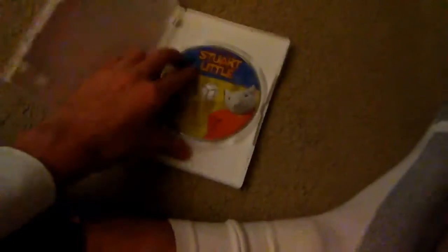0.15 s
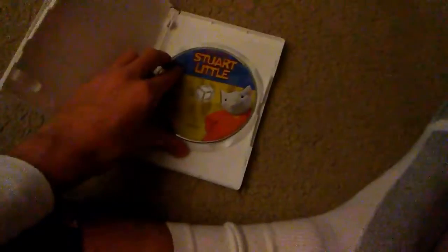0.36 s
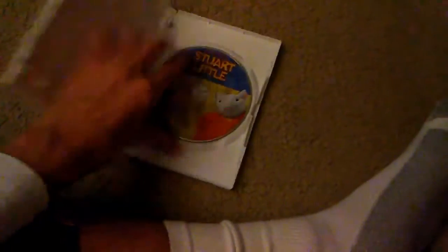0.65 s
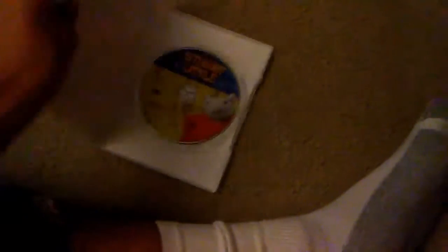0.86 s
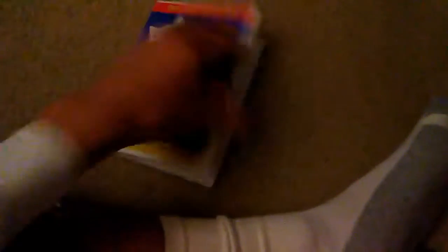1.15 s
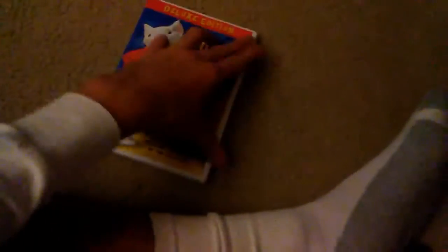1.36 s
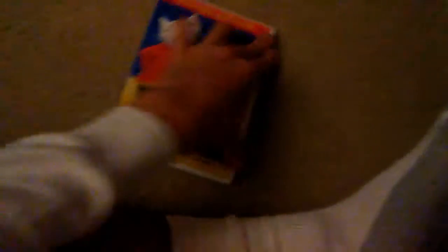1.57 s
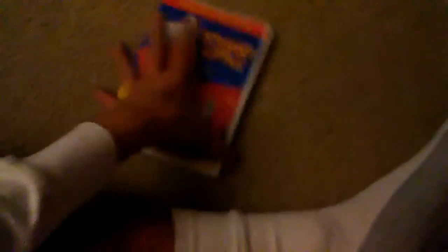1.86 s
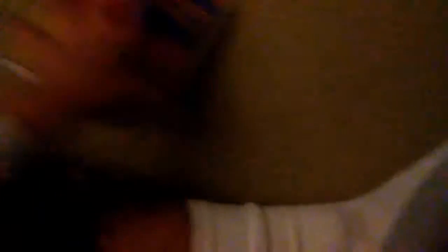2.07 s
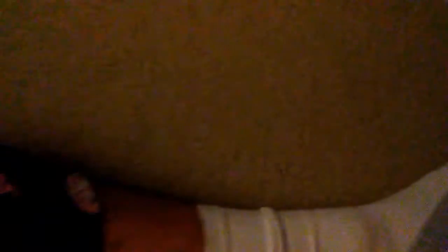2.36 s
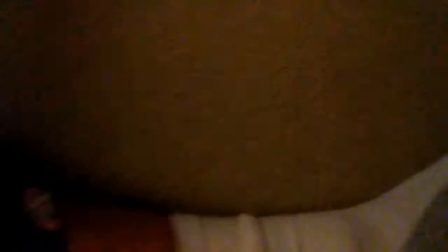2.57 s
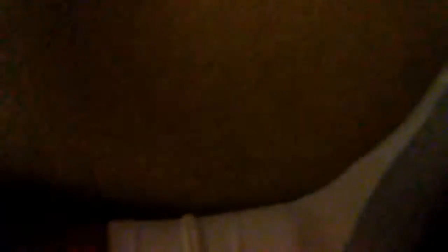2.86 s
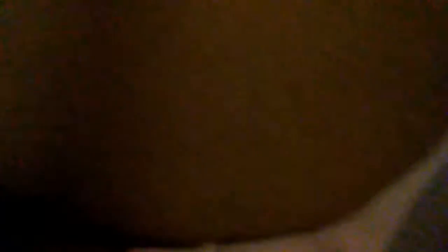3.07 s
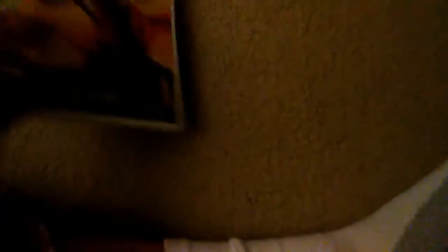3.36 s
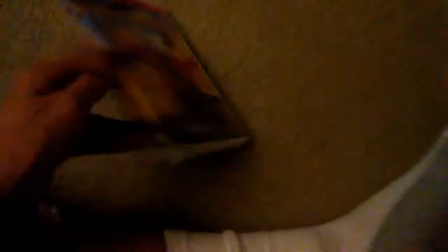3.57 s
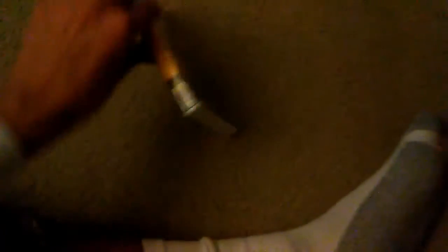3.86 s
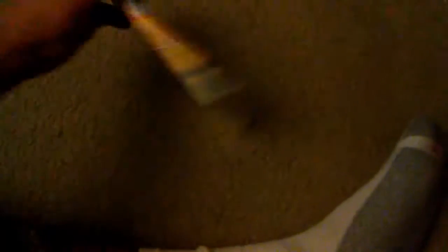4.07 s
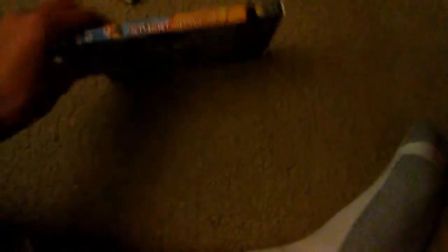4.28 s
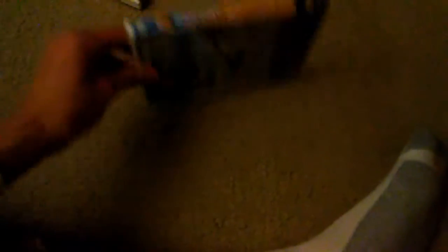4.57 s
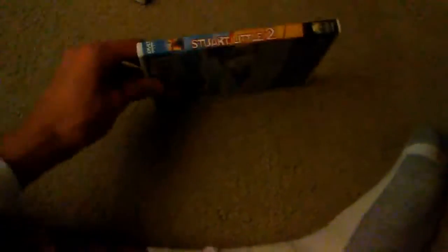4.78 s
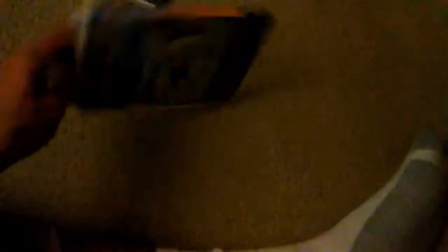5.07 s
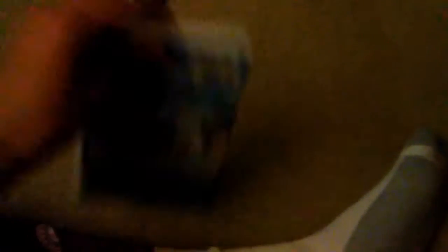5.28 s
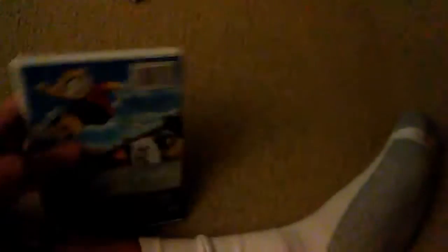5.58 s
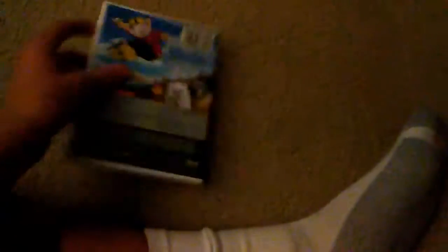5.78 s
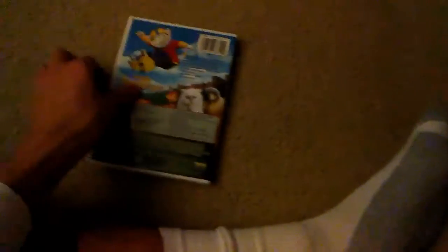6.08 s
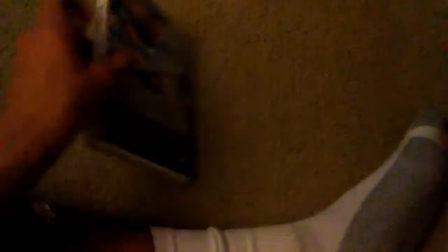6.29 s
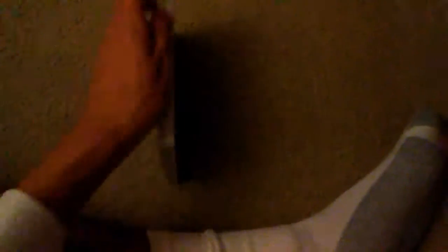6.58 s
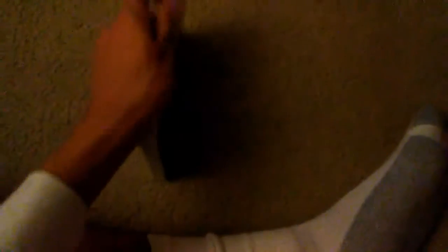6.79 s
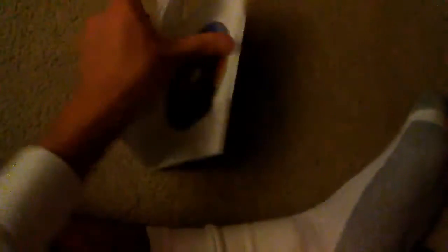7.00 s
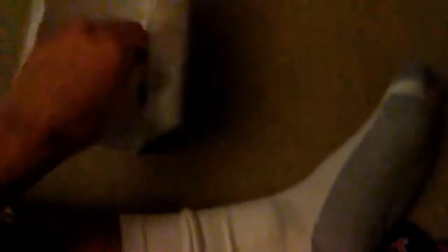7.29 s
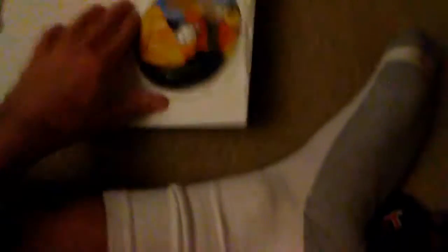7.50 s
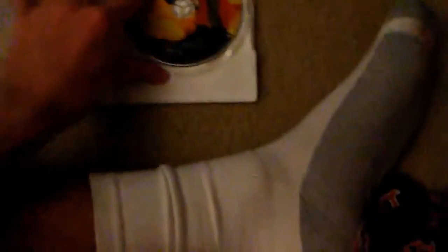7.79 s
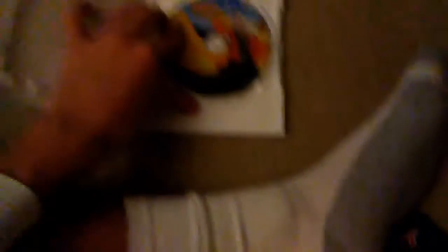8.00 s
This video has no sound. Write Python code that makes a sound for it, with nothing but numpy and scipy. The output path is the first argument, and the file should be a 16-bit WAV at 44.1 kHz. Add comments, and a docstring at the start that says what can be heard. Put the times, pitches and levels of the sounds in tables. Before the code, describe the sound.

Sharp plastic clicks and rattling clacks come from disc cases being shut, dropped and opened on a carpeted floor near the microphone. The loudest snaps fall in the first half, followed by a quieter spell of small grip creaks and sleeve rustle. The clatter then returns twice and ends in a few soft taps. Muffled bumps accompany the handling, with a short room echo and low steady hiss.

```python
"""A hand shuts, drops, turns and opens thin plastic disc cases on a carpet, near a small camera.
Over steady hiss, rumble and a thin whine, dull bumps shake the floor and skin and sleeve rub.
Snaps and knocks, each a rattle of contacts ringing the shell, echo in a furnished room, loudest at
1.7, 2.5 and 3.1 s. From 3.8 to 4.8 s the closed case creaks as gripping fingers stick and slip.
Clatter returns near 6 and 7 s, then thins to light taps. The camera rounds the loudest peaks."""
import sys
import numpy as np
from scipy import signal
from scipy.fft import rfft, irfft
from scipy.io import wavfile
from scipy.ndimage import uniform_filter1d

SR = 44100
rng = np.random.default_rng(int(sys.argv[2]) if len(sys.argv) > 2 else 0)


def output_pcm(signal):
    """Save a mono or channel-first signal as 16-bit PCM at the path in sys.argv[1].

    Samples are clipped to [-1, 1] before scaling.
    """
    pcm = np.clip(np.atleast_2d(signal).T, -1, 1) * 32767
    wavfile.write(sys.argv[1], SR, np.round(pcm).astype(np.int16))


N = 358533


def undb(db):
    return 10 ** (np.asarray(db) / 20)


def unit_rms(x):
    return x / np.sqrt(np.mean(x ** 2, axis=-1, keepdims=True))


def on_log_hz(hz, table):
    table_hz, values = np.transpose(table)
    return np.interp(np.log(hz + 1), np.log(table_hz), values)


def ring(x, modes, gains=None):
    """Rows of x through parallel resonances; default gains alternate in sign."""
    mode_hz, width_hz, db = np.transpose(modes)[:, :, None]
    ratio = (np.fft.rfftfreq(x.shape[-1], 1 / SR) + 1e-9) / mode_hz
    responses = undb(db) / (1 + 1j * mode_hz / width_hz * (ratio - 1 / ratio))
    if gains is None:
        gains = (-1.) ** np.arange(len(modes))
    return irfft(rfft(x) * (gains @ responses), x.shape[-1])


def wander(rate_hz):
    """Random steps, smoothed twice; spread near 1."""
    hold = int(SR / rate_hz)
    steps = np.repeat(rng.standard_normal(N // hold + 1), hold)
    return 1.6 * uniform_filter1d(uniform_filter1d(steps, hold), hold)[:N]


def place(start_s, rows):
    """Sums rows into one track at their start times."""
    track = np.zeros(N + rows.shape[1])
    first = (np.clip(start_s, 0, None) * SR).astype(int)
    np.add.at(track, first + np.arange(rows.shape[1]), rows)
    return track[:N]


# Noise spectrum: freq_hz, relative_density_db
HISS_SPECTRUM = [(26, -33), (45, 1.5), (166, -1.5), (251, -8.5), (338, -15.5), (1340, -18.5), (2240, -19),
                 (3850, -19), (8040, -22), (12200, -22.5), (13100, -13.5), (16000, -30.5)]


def camera_noise(hiss_db=-69, whine_db=-71.5, whine_hz=13500):
    """Hiss and rumble, plus an electronic whine of wavering level."""
    shape = undb(on_log_hz(np.fft.rfftfreq(N, 1 / SR), HISS_SPECTRUM))
    hiss = unit_rms(irfft(rfft(rng.standard_normal(N)) * shape, N))
    whine = np.sqrt(2) * np.sin(2 * np.pi * whine_hz * np.arange(N) / SR) * undb(1.5 * wander(6))
    return undb(hiss_db) * hiss + undb(whine_db) * whine


# Floor modes: freq_hz, width_hz, gain_db
FLOOR_MODES = [(58, 27, 2), (108, 160, 2.5)]
# Soft pushes: start_s, level_db, length_ms
BUMPS = [(0, -35.5, 20), (0.1, -40, 29), (0.99, -57.5, 59), (1.648, -52, 97), (1.98, -71, 130),
         (2.811, -60, 38), (2.899, -41.5, 76), (3.117, -39.5, 51), (3.431, -53.5, 71), (4.118, -58.5, 47),
         (4.741, -57.5, 66), (5.952, -45, 29), (6.041, -40.5, 30), (7.04, -43, 61), (7.258, -46, 147),
         (7.41, -45.5, 45)]


def bumps(size=16384):
    """Dull pushes shake the floor under the carpet."""
    start_s, level_db, length_ms = np.transpose(BUMPS)[:, :, None]
    t_ms = np.arange(size) / SR * 1000
    push = rng.standard_normal((len(BUMPS), size)) * np.sin(np.pi * np.clip(t_ms / length_ms, 0, 1))
    shake = unit_rms(ring(ring(push, FLOOR_MODES), FLOOR_MODES))
    return place(start_s, undb(level_db) * np.sqrt(length_ms / t_ms[-1]) * shake)


# Friction peaks, mid (grit) and high (sheen): freq_hz, width_hz, gain_db
GRIT_PEAKS = [(4270, 440, 1.5), (5840, 900, -2.5), (6770, 270, -6), (3700, 450, -6)]
SHEEN_PEAKS = [(11200, 2500, -2.5), (12200, 1300, 2.5), (15000, 7500, -6.5)]
# Case wall and catch modes, rubbed or knocked: freq_hz, width_hz, gain_db
SHELL_MODES = [(730, 54, -3), (941.7, 99, 2), (1160, 240, 0), (1458, 210, 1), (1652, 210, 0),
               (1960, 160, 0), (2180, 170, -1.5), (2525, 130, 3.5), (2723, 290, -1.5), (3110, 210, -3.5)]
# Skin and cloth strokes: centre_s, length_ms, grit_db, dryness_db
STROKES = [(0.008, 31, -31, -13.5), (0.054, 20, -34, 0.5), (0.139, 163, -45, -3.5), (0.3, 62, -64.5, 9),
           (0.428, 57, -74.5, 4), (0.77, 44, -65.5, 6.5), (0.868, 32, -47.5, 4.5), (1.9, 230, -69, -3),
           (2.04, 113, -73, 4.5), (2.982, 72, -54.5, -2.5), (3.126, 42, -52.5, -6.5), (3.6, 148, -66, -2),
           (3.77, 78, -65, -1.5), (3.88, 79, -61.5, -1.5), (4.17, 131, -67, 6.5), (4.4, 160, -69.5, 5),
           (5.07, 141, -55, 2.5), (5.62, 190, -59, 4.5), (5.863, 110, -61, -2.5), (6.599, 120, -63.5, 1.5),
           (6.78, 150, -67, 6), (6.941, 126, -64, 3.5), (7.23, 310, -55, 2), (7.397, 195, -44.5, -4.5),
           (7.51, 164, -57.5, 8), (7.57, 33, -44.5, 1.5), (7.68, 60, -65, 4), (8.07, 42, -73.5, -6)]


def rubbing(slips_per_s=120, slip_db=20, step=64):
    """Stick-slip grit swells and fades; drier strokes have more sheen and less shell."""
    centre_s, length_ms, grit_db, dryness_db = np.transpose(STROKES)[:, :, None]
    t = np.arange(N // step + 1) * step / SR
    swell = 1 / (1 + ((t - centre_s) / (length_ms / 2000)) ** 2) ** 1.4
    slips = undb(slip_db) * rng.standard_normal(N) * (rng.random(N) < slips_per_s / SR)
    rub = 0
    for modes, level_db, slip_share in ((GRIT_PEAKS, grit_db, .25),
                                        (SHEEN_PEAKS, grit_db - 2.5 + dryness_db, .3),
                                        (SHELL_MODES, grit_db - 6 - .64 * dryness_db, 1)):
        grit = rng.standard_normal(N) * undb(.57 * rng.exponential(size=N) + 2.5 * wander(40))
        envelope = np.sqrt(np.sum((undb(level_db) * swell) ** 2, axis=0))
        rub += np.repeat(envelope, step)[:N] * unit_rms(ring(grit + slip_share * slips, modes))
    return rub


# Modes of flexing lids, rims and ribs, contact spot: freq_hz, width_hz, gain_db
LID_MODES = [(154, 12, -0.5), (232, 55, -4), (326, 100, -0.5), (464, 49, -0.5), (610, 10, -14)]
EDGE_MODES = [(3640, 390, -5), (4710, 536, 0), (5720, 766, 1), (5790, 600, -0.5), (6408, 350, -9.5)]
CRACK_MODES = [(8340, 690, -10), (10300, 300, 1), (11840, 1000, 3.5), (15100, 1400, -6.5)]
# Snaps and knocks: start_s, shell_db, pitch_hz, thud_re_shell_db, edge_re_shell_db, rattle_ms
KNOCKS = [(0.0229, -17.5, 2480, -8.5, -7, 4.54), (0.0393, -18.5, 2200, -22.5, -8.5, 6.3),
          (0.09, -27.5, 2300, -39, -6, 5.9), (0.0992, -21, 2410, -19, -10, 2.7),
          (0.106, -33, 1070, 1.5, -5, 5.5), (0.121, -22, 2560, -35, -13, 4.2),
          (0.1664, -24, 2510, -17.5, -4, 3.76), (0.2434, -33, 2370, -18, -10.5, 5.4),
          (0.2661, -40.5, 2560, -30.5, -6, 3.8), (0.333, -55, 2020, -23, -14, 2.8),
          (0.842, -46, 2490, -30, -4, 3.76), (0.8492, -37, 2480, -34.5, 2, 4.6),
          (0.86, -46.5, 1500, -30, 6.5, 7), (0.9444, -54, 1340, -3, 1.5, 4.4),
          (1.0093, -47, 2330, -1, -11.5, 7.5), (1.1672, -49.5, 1420, -36, -16, 0.46),
          (1.3785, -29, 1307, -8, -19, 1.37), (1.3948, -44, 2550, -8.5, -2, 3.5),
          (1.5574, -46.5, 2500, -18, -15, 2.95), (1.631, -49, 2560, -0.5, -7, 8.3),
          (1.651, -8.5, 2084, -17, -5, 1.5), (1.6774, -11.5, 2130, -22, -3.5, 1.29),
          (1.6913, -19.5, 1160, -12, -3.5, 9.3), (2.27, -55.5, 1027, -11.5, -12.5, 3.3),
          (2.2812, -41, 1085, -15.5, -16.5, 3), (2.316, -58, 1243, -21, -11.5, 2.8),
          (2.4439, -10, 2740, -15, -8, 0.74), (2.4656, -7.5, 738, -1, -7.5, 1.78),
          (2.8168, -62, 730, 6, -16, 1.0), (2.8975, -34.5, 747, -10.5, -4, 7.1),
          (2.9109, -34, 3200, -3.5, -9, 8.3), (2.9264, -30.5, 2380, -6, 1, 3.4),
          (2.9382, -31, 2646, -9.5, -0.5, 6.2), (3.0241, -53.5, 2630, -4, 2, 7.8),
          (3.1392, -11, 2020, -8.5, -4.5, 0.44), (3.259, -52, 1380, -12, -22, 32),
          (3.42, -42.5, 1996, -13.5, -4.5, 7.1), (3.4324, -31.5, 3070, -13.5, -6, 1.7),
          (3.452, -33, 2850, -14, -4.5, 6.7), (3.544, -49.5, 2904, -9, -1.5, 4.7),
          (3.7309, -45.5, 2634, -12, 0, 2.93), (5.459, -62.5, 2400, -19.5, -7, 12),
          (5.5186, -47.5, 933, -21.5, -3.5, 4.4), (5.545, -54, 940, -27, -9, 14),
          (5.5712, -41, 2390, -36, -14, 1.53), (5.587, -39.5, 2220, -35, -5.5, 2.3),
          (5.61, -54, 2380, -28, -12, 16), (5.75, -58.5, 1656, -19.5, -10.5, 9),
          (5.94, -41, 1960, -15.5, -7.5, 3), (5.9464, -25, 1290, -7, -14, 4.3),
          (5.9562, -18.5, 2560, -2, 0, 4.07), (5.9804, -21.5, 1320, -12.5, -18, 4.1),
          (6.037, -30.5, 1820, -22, -14, 3.7), (6.058, -22, 1013, -7, -2.5, 3.3),
          (6.0687, -18, 2560, -11, -7.5, 5.36), (6.085, -32, 2990, -7, 0.5, 3),
          (6.0999, -42, 2500, -6.5, 3.5, 2.3), (6.351, -42, 2346, -11.5, -23, 1.7),
          (6.3637, -55, 1698, -12.5, -6, 4.9), (6.3856, -55, 1000, -14, -4, 3.5),
          (6.5228, -54, 1500, -12.5, 6, 1.33), (6.545, -48.5, 3330, -15, 1, 6.5),
          (6.896, -57, 3220, -26, 3, 8.3), (7.0112, -46.5, 2560, -25, -6, 1.9),
          (7.0324, -32.5, 2580, -14, -14, 2.3), (7.0421, -12, 2030, -11, -4, 3.5),
          (7.0605, -15, 2646, -30, -2, 5.84), (7.085, -17, 1960, -28, -3.5, 6.9),
          (7.1705, -28, 1960, -22, -5, 4.2), (7.185, -41.5, 1960, -26, 3, 2.5),
          (7.241, -44, 943, -18, -12, 9), (7.263, -31, 940, -18, -13, 4.6),
          (7.2885, -33.5, 2560, -39, -5.5, 9.7), (7.3391, -16, 2310, -15.5, -5, 7.8),
          (7.3667, -23.5, 2680, -27, -8, 12), (7.4187, -28.5, 2540, -38, -20, 5.6),
          (7.4344, -30, 2320, -12.5, -5.5, 6), (7.5919, -43.5, 983, -23.5, -17.5, 1.9),
          (7.617, -56, 2600, -22, -10, 4.9), (7.7709, -51.5, 787, -27.5, -4, 6.6),
          (8.0266, -46.5, 1835, -22.5, -9.5, 3.76)]


def knocks(focus_oct=.13, scatter_db=3.5, ring_ms=3.3, size=4096):
    """Spiky bursts of contacts ring the case. Returns the direct sound and the room feed."""
    start_s, shell_db, pitch_hz, thud_db, edge_db, rattle_ms = np.transpose(KNOCKS)[:, :, None]
    t_ms = np.arange(size) / SR * 1000
    draws = rng.standard_normal((len(KNOCKS), 2 * size + 64))
    noise, spikes, scatter = np.split(draws, [size, 2 * size], axis=1)
    rise_ms = .15 + .04 * rattle_ms ** 2  # long scrapes start softly
    attack = 1 - np.exp(-(t_ms / rise_ms) ** 2)
    decay = np.exp(-(t_ms / (1.2 * rattle_ms + rise_ms)) ** 2)
    burst = noise * undb(4.4 * spikes) * attack * decay
    impulse = np.tile(np.arange(size) == 0, (len(KNOCKS), 1))
    crack_db = -10.5 + .46 * edge_db - 3 * np.log2(rattle_ms)
    focus_db = 7 - .36 * shell_db  # light taps hollow, hard snaps broad
    direct = diffuse = 0
    for modes, part_db in ((LID_MODES, thud_db), (SHELL_MODES, 0),
                           (EDGE_MODES, edge_db), (CRACK_MODES, crack_db)):
        modes = np.array(modes)
        signs = (-1.) ** np.arange(len(modes))
        boost_db = focus_db * np.exp(-(np.log2(modes[:, 0] / pitch_hz) / focus_oct) ** 2)
        mode_scatter, scatter = np.split(scatter, [len(modes)], axis=1)
        gains = signs * undb(boost_db + scatter_db * mode_scatter)
        direct += undb(part_db) * unit_rms(ring(burst, modes, gains))
        merged_modes = modes * [1, 1.8, 1]  # heard from all sides, modes widen and even out
        diffuse += undb(part_db) * unit_rms(ring(impulse, merged_modes, signs * undb(.4 * boost_db)))
    gate = t_ms < t_ms[-1] / 2
    strength = undb(shell_db - 1) * np.sqrt((rattle_ms + ring_ms) / t_ms[-1]) * gate
    return (place(start_s - .65 * rise_ms / 1000, strength * direct),
            place(start_s + rattle_ms / 2000, strength * diffuse))


# Furnished room decay: freq_hz, t60_s
ROOM_DECAY = [(60, 0.11), (200, 0.22), (1000, 0.18), (4000, 0.22), (14000, 0.11)]


def room(x, level_db=-7.5, rise_ms=2.2):
    """Diffuse echoes build up quickly and die by octave band."""
    t = np.arange(int(.8 * SR)) / SR
    hz = np.fft.rfftfreq(len(t), 1 / SR)
    white = rfft(rng.standard_normal(len(t)))
    tail = 0
    for centre_hz in 40 * 2. ** np.arange(9):
        band = np.clip(1 - abs(np.log2((hz + 1) / centre_hz)), 0, 1)
        tail += irfft(white * band, len(t)) * undb(-60 * t / on_log_hz(centre_hz, ROOM_DECAY))
    tail *= 1 - np.exp(-(t * 1000 / rise_ms) ** 2)
    return undb(level_db) * signal.fftconvolve(x, tail / np.sqrt(np.sum(tail ** 2)))[:N]


# Modes of the case held shut: freq_hz, width_hz, gain_db
GRIPPED_MODES = [(846, 95, -2), (1786, 170, -2.5), (2560, 77, 1.5), (3170, 90, 3.5), (3960, 470, -8),
                 (4585, 364, -4), (6180, 900, -12.5), (12400, 2000, -21)]
# Grip creaks: start_s, length_ms, level_db
CREAKS = [(3.785, 8, -58.5), (3.848, 8, -60), (4.13, 29, -45.5), (4.352, 20, -64), (4.399, 21.5, -53),
          (4.562, 24.9, -63), (4.742, 64, -46)]


def creaks(slip_ms=6.8, stick_ms=10, fade_db=5.5, scatter_db=1.5, max_slips=10, size=2048):
    """Fingers stick and slip at uneven gaps with fading force; each slip rings the closed case."""
    start_s, length_ms, level_db = np.transpose(CREAKS)[:, :, None]
    jitter, scatter = np.split(rng.standard_normal((len(CREAKS), 2 * max_slips)), 2, axis=1)
    waits_ms = stick_ms * np.exp(.2 * jitter)
    onset_ms = np.cumsum(waits_ms, axis=1) - waits_ms
    progress = onset_ms / length_ms
    force = undb(level_db - fade_db * progress ** 2 + scatter_db * scatter) * (progress < 1)
    t_ms = np.arange(size) / SR * 1000
    slips = rng.standard_normal((force.size, size)) * np.sin(np.pi * np.clip(t_ms / slip_ms, 0, 1))
    ringing = unit_rms(ring(slips, GRIPPED_MODES)) * (t_ms < .75 * t_ms[-1])
    strength = force.reshape(-1, 1) * np.sqrt(slip_ms / t_ms[-1])
    return place((start_s + onset_ms / 1000).reshape(-1, 1), strength * ringing)


def scene():
    """Mono mix; only knocks and creaks feed the room."""
    direct, diffuse = knocks()
    grip = creaks()
    echoes = room(diffuse + undb(-6) * grip)  # the hand shades the creaks
    return (direct + grip + echoes + bumps() + rubbing() + camera_noise())[None]


def record(dry, ceiling=1.8, cutoff_hz=16000):
    """Camera input: soft saturation, then a steep low-pass."""
    lowpass = signal.ellip(12, .3, 100, cutoff_hz, fs=SR, output="sos")
    return signal.sosfilt(lowpass, ceiling * np.tanh(dry / ceiling))


dry = scene()
out = record(dry)
output_pcm(out)
```